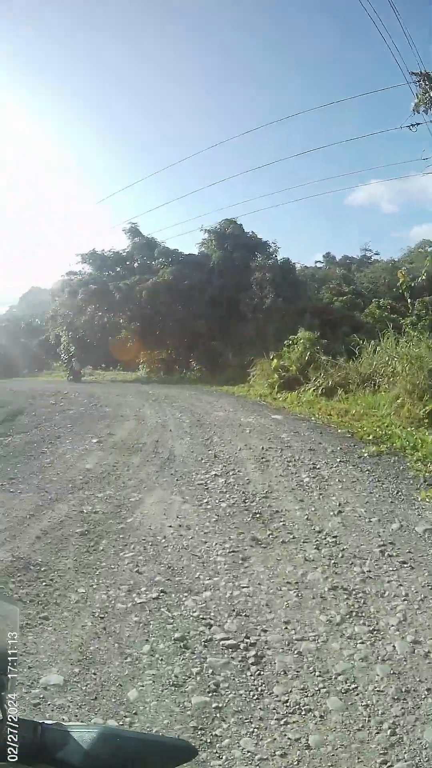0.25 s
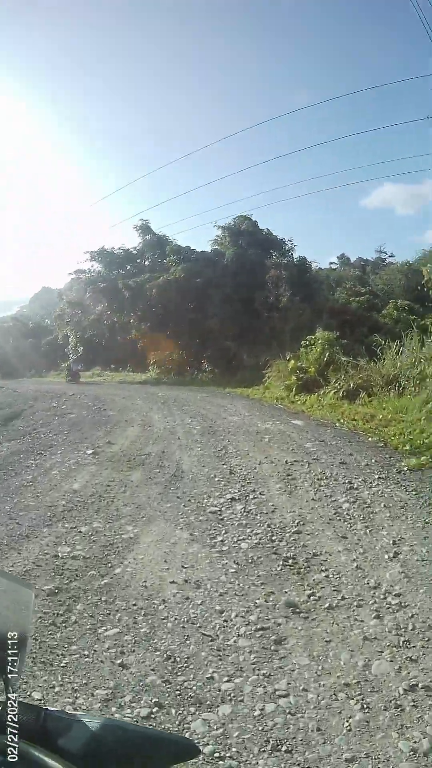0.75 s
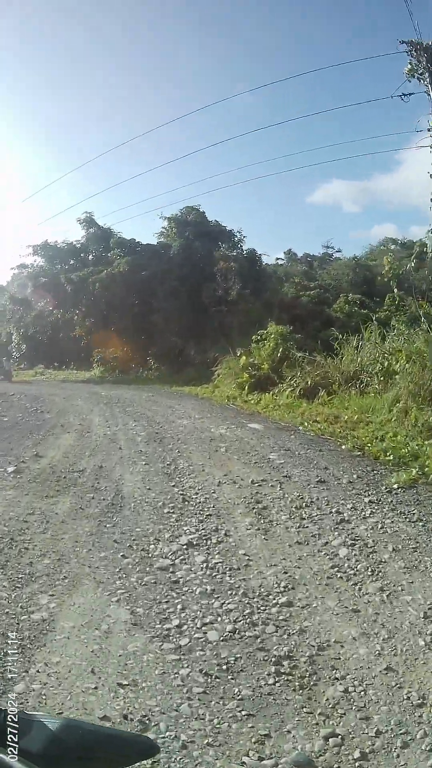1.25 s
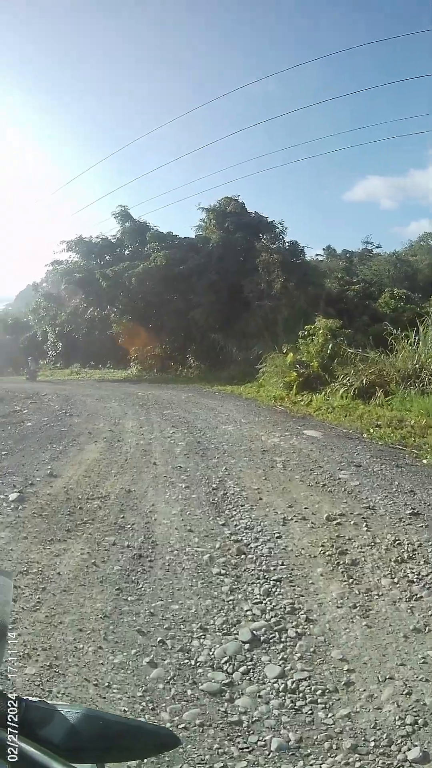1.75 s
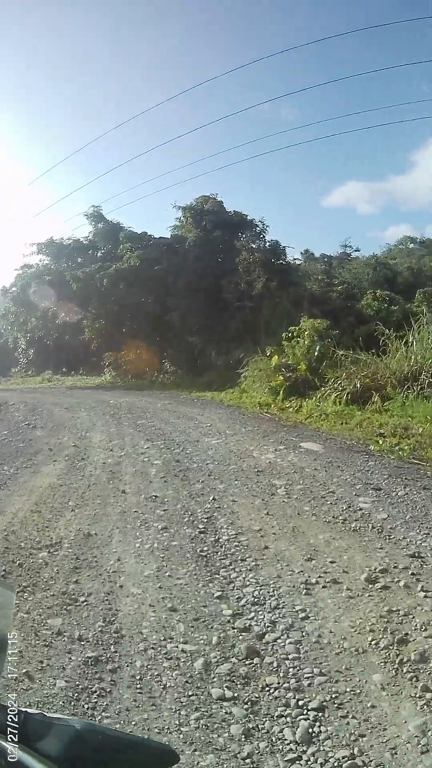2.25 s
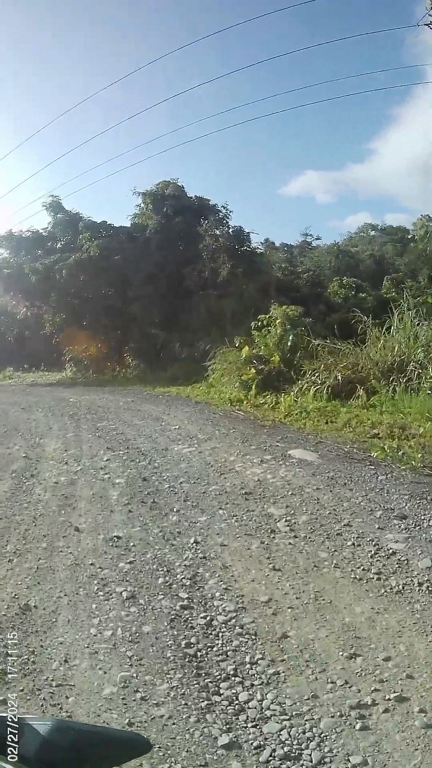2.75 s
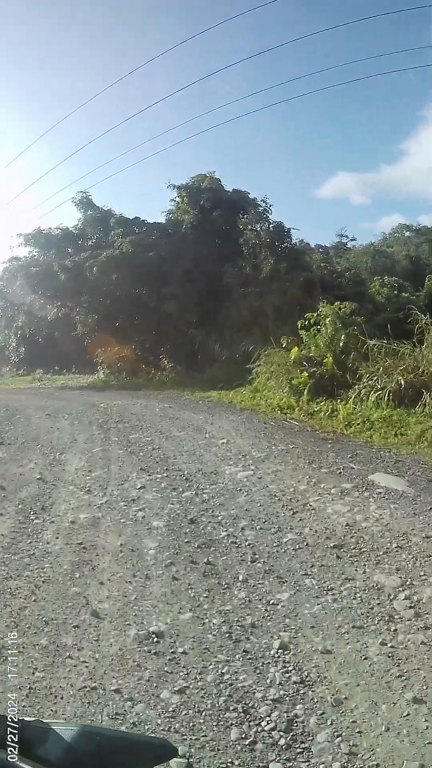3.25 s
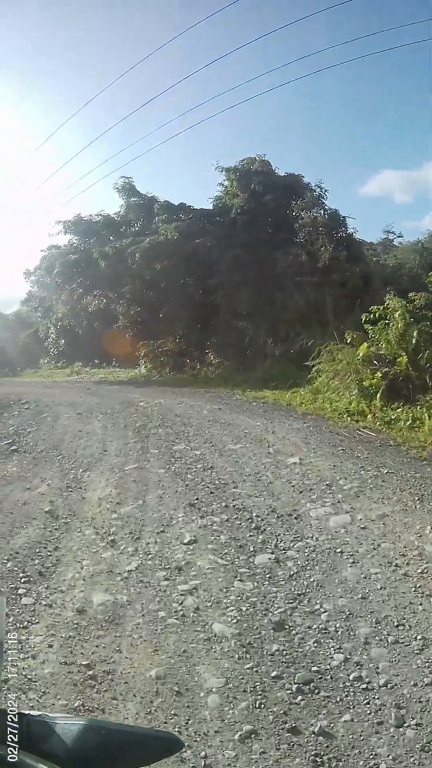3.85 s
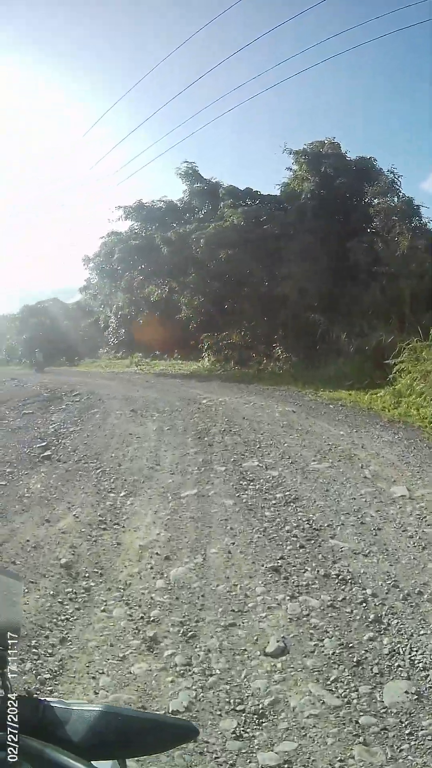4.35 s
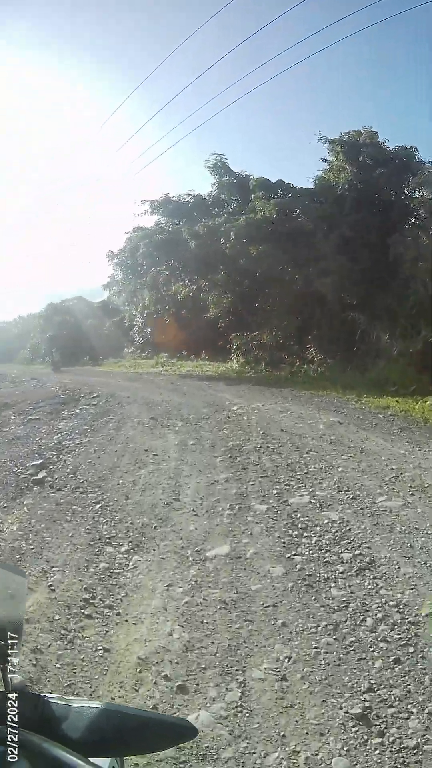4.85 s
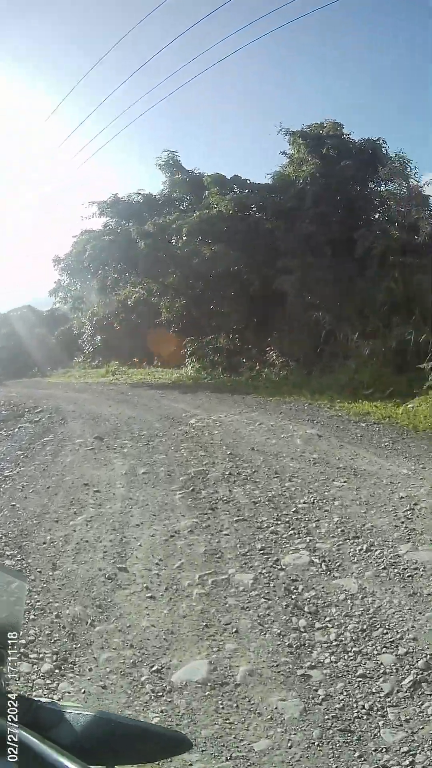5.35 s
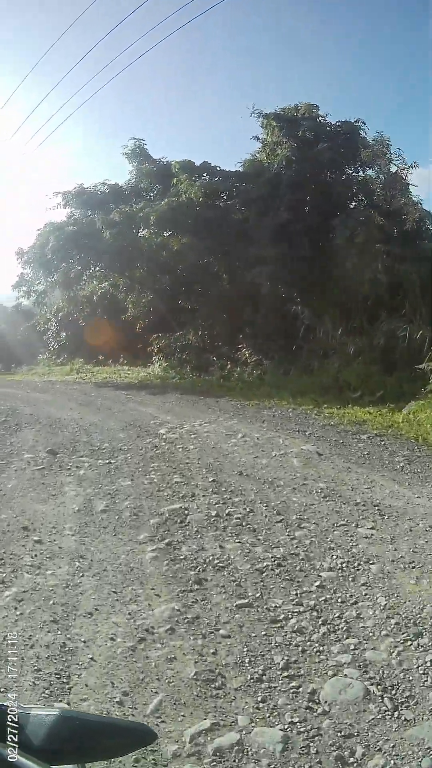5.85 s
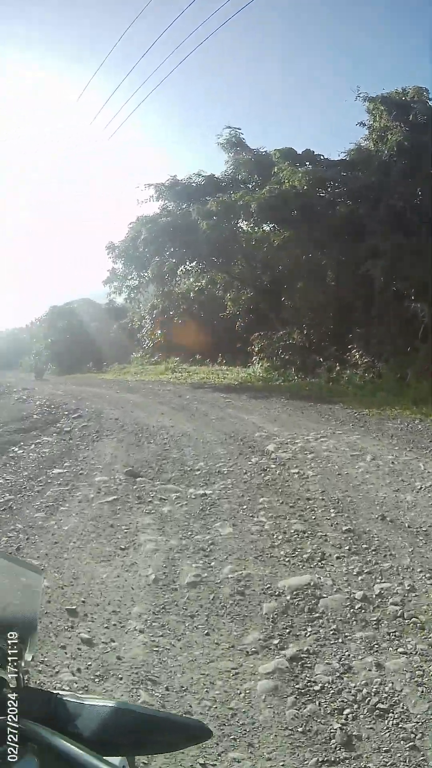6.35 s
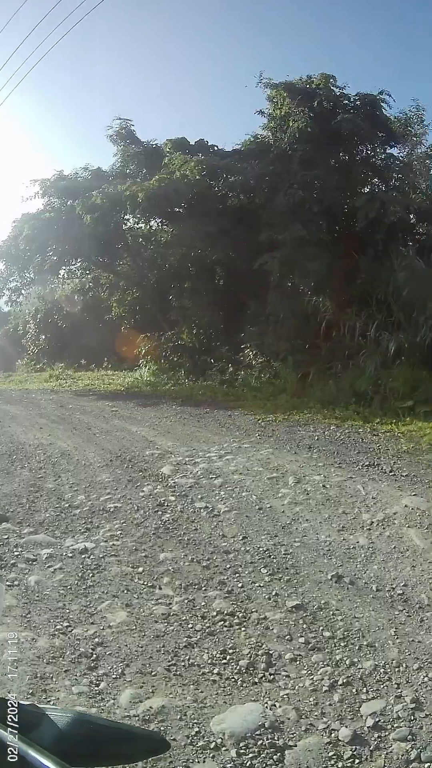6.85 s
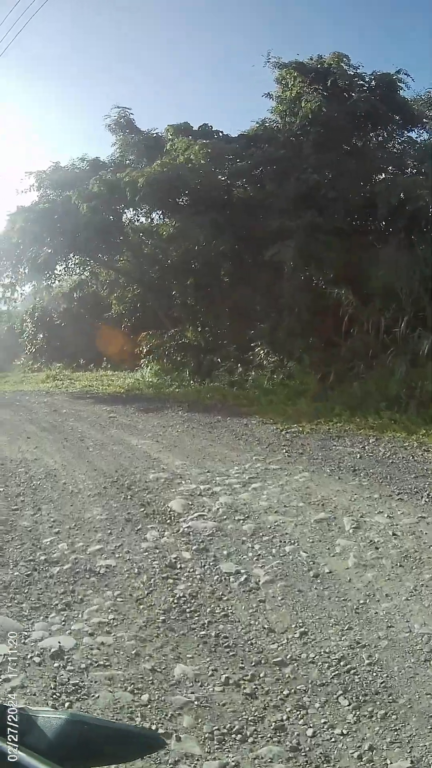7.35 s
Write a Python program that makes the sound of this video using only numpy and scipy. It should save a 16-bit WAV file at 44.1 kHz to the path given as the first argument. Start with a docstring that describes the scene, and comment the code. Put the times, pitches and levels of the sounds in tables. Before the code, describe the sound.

The sound starts with the motorcycle already moving and continues to about 7.5 seconds without stopping. A two-cylinder engine at low revs putters in quick pairs, roughly twelve a second, with low, round exhaust thumps and boxy, midrange clatter and knocking. A few misses occur in the first 0.3 seconds, then it runs fairly evenly until about 1.9; from 3 onward it misses often, turning lumpy with low fluttering puffs. A hollow drone wavers up around 1.2-1.6, 2.4 and 3.7-4. Tyres rumble steadily underneath. Stones knock the frame irregularly, notably at 2.8, 3.9, a hardest one at 4.5, then 5.35, 6.2, 7.3 and 7.45. Dry grit snaps at 0.5, 2.9, 3.95 and 5.35. Faint pulsing whirr and hiss sit on top, with tiny, very high insect chirps near 0.5, 3.4, 4.3, 5.2 and 6.1. Close on-bike microphone, outdoors, dull and dry.

```python
"""Twin-cylinder motorcycle on gravel

A motorcycle plods along a gravel road at low revs, heard from a small camera on the bike. The cylinders fire in
quick pairs and often miss: exhaust pulses ring tuned silencer modes, and a miss adds a burst of low noise.
The case clatters (filtered noise) and knocks on the frame (ringing modes), with a wavering drone, a pulsing
whirr and tyre rumble. Stones ring the frame, grit cracks in noise bursts, an insect chirps pure tones far off."""
import sys
import numpy as np
from scipy import signal
from scipy.fft import rfft, irfft
from scipy.io import wavfile

SR = 44100
rng = np.random.default_rng(int(sys.argv[2]) if len(sys.argv) > 2 else 0)


def digitize_waveform(pressure):
    """Quantize a signal to 16-bit integers and store it at the path in sys.argv[1].

    Rows of a 2-D input are taken as channels; values are limited to [-1, 1].
    """
    field = np.atleast_2d(pressure).T
    bounded = np.clip(field, -1, 1)
    quanta = np.round(bounded * 32767).astype(np.int16)
    wavfile.write(sys.argv[1], SR, quanta)


N = 336042

# Spectrum of a dull knock. Each row: frequency in Hz, relative density in dB per Hz.
KNOCK_SPECTRUM = [(300, -12), (700, 9), (1400, -13), (2400, -12.5), (3200, -30.5), (4500, -30), (6500, -45),
                  (12000, -82.5)]
# Ringing modes of the frame. Each row: frequency in Hz, relative level under a stone in dB,
# relative level under a combustion knock in dB, time to fall 60 dB in seconds.
FRAME_MODES = [(498.5, -6.5, -1, 0.027), (708, -2.5, 0.5, .04), (800, -4, -11, 0.03),
               (1150, -8, -4.5, 0.032), (1305, -1, -12.5, 0.02), (1411, 1.5, -7, 0.019),
               (1556, -23.5, -9, 0.038), (1940, -17.5, -17.5, 0.0081), (2516, -25.5, -11, 0.026),
               (2740, -25, -17.5, 0.013), (3460, -33, -37, 0.027)]


def from_db(db):
    """Decibels to gain."""
    return 10 ** (np.asarray(db) / 20)


def rms_one(x):
    """Scale to rms 1."""
    return x / np.sqrt(np.mean(x ** 2) + 1e-20)


def clicks(times_s, sizes):
    """One click per time, in a train with a run-in of 0.1 s."""
    train = np.zeros(N + SR // 5)
    places = np.round(np.asarray(times_s) * SR).astype(int) + SR // 10
    np.add.at(train, np.clip(places, 0, len(train) - 1), sizes)
    return train


def cut(x):
    """Drop the run-in."""
    return x[SR // 10:SR // 10 + N]


def ring(train, hz, t60):
    """Two-pole resonator: a unit click sets a sine of starting height 1 ringing, down 60 dB after t60 seconds."""
    r = from_db(-60 / (t60 * SR))
    w = 2 * np.pi * hz / SR
    return signal.lfilter([0, np.sin(w)], [1, -2 * r * np.cos(w), r * r], train + 1e-18)


def colour(x, spectrum, peaks=()):
    """Causal (minimum-phase) filter of unit energy from a spectrum and resonant lifts."""
    hz = np.maximum(np.arange(4097) * SR / 8192, 1)
    points = np.array(spectrum)
    db = np.interp(np.log(hz), np.log(points[:, 0]), points[:, 1])
    for centre_hz, width_hz, lift_db in peaks:
        db = db + lift_db / (1 + (2 * (hz - centre_hz) / width_hz) ** 2)
    # folding the cepstrum onto positive time gives the minimum phase
    cepstrum = irfft(np.log(from_db(db)))
    cepstrum[1:4096] *= 2
    cepstrum[4097:] = 0
    response = irfft(np.exp(rfft(cepstrum)))
    unit_response = response / np.sqrt(np.sum(response ** 2))
    return signal.fftconvolve(x, unit_response)[:len(x)]


def drift(rate):
    """Slow chance of spread 1: noise smoothed by two poles at this rate in Hz."""
    r = np.exp(-2 * np.pi * rate / SR)
    smooth = signal.lfilter([1], [1, -2 * r, r * r], rng.standard_normal(N + SR))
    return rms_one(smooth[SR:])


def dying(train, t60):
    """Noise that starts at each click and dies away by 60 dB in t60 seconds."""
    envelope = signal.lfilter([1], [1, -from_db(-60 / (t60 * SR))], train)
    return envelope * rng.standard_normal(len(train))


def bumps(times_s, rise_s):
    """After each time a swell of height 1 that peaks rise_s later."""
    r = np.exp(-1 / (rise_s * SR))
    return cut(signal.lfilter([np.e * (1 - r)], [1, -2 * r, r * r], clicks(times_s, 1) + 1e-18))


def swells(times_s, half_s):
    """A smooth bump of height 1 around each time (rows)."""
    distance_s = np.arange(N) / SR - np.asarray(times_s)[:, None]
    return np.exp(-(distance_s / half_s) ** 2)


def strike(times_s, db, scatter_db):
    """Blows (rows) through rubber and oil ring each frame mode (columns), which swells for a few ms."""
    contact_t60_s = 0.008
    luck = rng.standard_normal(db.shape)
    signs = np.where(luck * 7 % 1 < .5, 1, -1)
    sizes = from_db(db + scatter_db * luck) * signs
    swell = 2 * (1 - from_db(-60 / (contact_t60_s * SR)))    # offsets the gain of the second resonator
    total = 0
    for (hz, _, _, t60), size in zip(FRAME_MODES, sizes.T):
        total = total + swell * ring(ring(clicks(times_s, size), hz, t60), hz, contact_t60_s)
    return cut(total)


def firings():
    """Times, burns and unburnt puffs of both cylinders: the crank follows a speed curve and loses time at misses."""
    # Engine speed. Each row: time in seconds, length in ms of a cycle in which both cylinders burn.
    cycle_curve = [(-0.019, 80.38), (0.143, 85.35), (0.234, 79.66), (0.549, 76.43), (1.21, 90.89),
                   (1.466, 76.17), (1.621, 79.24), (2.09, 75.29), (2.317, 75.41), (3.016, 78.9),
                   (3.26, 82.14), (3.66, 73.18), (4.036, 74.2), (4.11, 81.89), (4.276, 78.05),
                   (4.596, 79.39), (4.996, 74.13), (5.304, 77.25), (5.934, 76.87), (6.176, 81.24),
                   (6.509, 82.73), (6.592, 78.94), (6.674, 82.97), (7.174, 80.21), (7.424, 84.6),
                   (7.508, 81.0)]
    # Misfiring cycles. Each row: time in seconds, burn of the first cylinder, burn of the second
    # (about 1 is full), strength of the unburnt puff for a full miss.
    misfire_rows = [(0.14, 0.91, 0.0, 1.1), (0.23, 0.48, 0.68, 0.64), (0.31, 0.91, 0.88, 1.2),
                    (1.94, 0.2, 0.84, 0.8), (2.24, 0.4, 1.0, 1.0), (2.55, 0.17, 0.76, 1.1),
                    (3.02, 0.12, 0.9, 0.9), (3.09, 0.07, 0.9, 1.1), (3.26, 0.02, 0.72, 1.4),
                    (3.34, 0.93, 0.12, 1.2), (3.5, 0.95, 0.7, 0.9), (3.66, 0.4, 0.52, 0.7),
                    (3.81, 0.28, 0.56, 0.9), (3.96, 0.0, 0.8, 0.9), (4.11, 0.84, 0.7, 1.2),
                    (4.28, 0, 0.44, 0.9), (4.43, 0.03, 0.6, 0.6), (4.6, 0.7, 0.7, 1.0),
                    (4.76, 0.09, 0.046, 0.68), (4.92, 0.2, 0, 0.9), (5.07, 0.24, 0.6, 0.89),
                    (5.22, 0, 0.64, 0.7), (5.38, 0.68, 0.7, 1), (5.54, 0.8, 0.29, 1.5),
                    (5.69, 0.56, 0.12, 1.0), (5.85, 0.07, 0.6, 0.9), (6.01, 0.12, 0.08, 0.99),
                    (6.18, 0.12, 0.56, 0.8), (6.34, 0.2, 0.68, 0.5), (6.51, 0.7, 1.08, 1.2),
                    (6.59, 0.88, 0.17, 1.7), (6.76, 0.8, 0.11, 1.5), (6.93, 0.2, 0.64, 1.1),
                    (7.09, 0.2, 0.72, 0.54), (7.34, 0.0, 0.68, 1.4)]
    first_exhaust_s, second_lag = -0.0197, 0.242    # the second cylinder follows by this share of a cycle
    miss_slows_ms = (2.75, 3.24)    # a full miss of each cylinder lengthens the cycle
    weak_late_ms = 1.55    # an empty charge leaves this much later, a weak one in proportion
    full_burn, burn_scatter = (0.87, 1.103), 0.049    # usual burn of each cylinder, and its spread
    crank_s, rows, misfires = first_exhaust_s, [], np.array(misfire_rows)
    while crank_s < N / SR:
        nearest = misfires[np.argmin(abs(misfires[:, 0] - crank_s))]
        missed = abs(nearest[0] - crank_s) < .03
        lack = np.clip(1 - nearest[1:3], 0, 1) * missed
        cycle_ms = np.interp(crank_s, *np.transpose(cycle_curve))
        late_ms = np.array([0, second_lag * cycle_ms]) + weak_late_ms * lack
        usual = full_burn + burn_scatter * rng.standard_normal(2)
        burn = nearest[1:3] if missed else usual
        rows.append([crank_s + late_ms / 1000, burn, lack * nearest[3]])
        crank_s += (cycle_ms + lack @ miss_slows_ms) / 1000
    # all cycles of the first cylinder, then all of the second
    return np.transpose(rows, (1, 2, 0)).reshape(3, -1)


def knock_times(s):
    """Combustion knocks come ahead of the exhaust pulse of each cylinder."""
    early_s = (0.018, 0.015)
    return s - np.repeat(early_s, len(s) // 2)


def rumble():
    """Tyres and frame: low noise whose level drifts slightly."""
    # Each row: frequency in Hz, relative density in dB per Hz.
    spectrum = [(25, -42), (45, -20), (70, 12), (120, 10.5), (200, 5), (320, 9), (400, -7), (600, -48),
                (2000, -110)]
    level = from_db(-32.5 + 0.77 * drift(4.3))
    return level * colour(rng.standard_normal(N), spectrum)


def exhaust(s, burn, puff):
    """Burnt and unburnt charges strike the silencer modes differently, softened above and thinned below."""
    # Silencer modes. Each row: frequency in Hz, time to fall 60 dB in seconds,
    # signed height per unit of burn, signed height per unit of unburnt puff.
    silencer = [(72.75, 0.2, -0.43, -0.038), (98.3, .162, 0.0092, 0.24), (133.3, 0.055, 0.62, 0.086),
                (181.5, 0.069, 0.26, -0.08), (330.6, 0.12, -0.2, -0.02)]
    miss_late_s, pulse_soft_hz, mic_low_hz = 0.003, 271, 41    # unburnt gas leaves a little later
    burnt = clicks(s, burn)
    missed = clicks(s + miss_late_s, puff)
    modes = sum(ring(full * burnt + miss * missed, hz, t60) for hz, t60, full, miss in silencer)
    soft = signal.lfilter(*signal.butter(2, pulse_soft_hz, fs=SR), modes)
    return cut(signal.lfilter(*signal.butter(2, mic_low_hz, "high", fs=SR), soft))


def engine_case(s, burn):
    """Gears and valves clatter, uneven in each register; each combustion bursts in noise and rings the frame."""
    # Engine case heard through the camera shell. Each row: frequency in Hz, relative density in dB per Hz.
    case = [(220, -16.5), (400, -7), (600, -2.5), (900, -12.5), (1300, -19.5), (1750, -26), (2300, -30.5),
            (3000, -36.5), (4000, -58.5), (6500, -78), (15000, -110)]
    # Resonances of the shell. Each row: centre in Hz, width in Hz, lift in dB (negative dips).
    shell = [(512, 94, 7), (604, 28, -9.5), (697.6, 73, 7), (1070, 79, 7), (1397, 160, 9), (2090, 170, 7),
             (2474, 41, 4.5)]
    clatter_db, clatter_swing_db = -36.5, -1.75    # level between knocks, and its slow drift
    clatter_lift, clatter_rise_s = 0.5, 0.008    # each knock shakes the case: the clatter swells after it
    knock_db, knock_rise_s, knock_t60_s = -47, 0.0023, 0.018    # rms of the noise bursts, their shape
    knock_ring_db = -41    # level of the frame ring, before the strength of each knock
    knock_s = knock_times(s)

    drifting = from_db(clatter_db + clatter_swing_db * drift(2.3))
    level = drifting * (1 + clatter_lift * bumps(knock_s, clatter_rise_s))
    taps = 0
    for edges_hz in ([150, 646], [600, 900], [900, 1250], [1250, 1800], [1800, 12000]):
        band_filter = signal.butter(2, edges_hz, "band", fs=SR, output="sos")
        band = signal.sosfilt(band_filter, rng.standard_normal(N))
        taps = taps + band * from_db(3.5 * drift(35) + 1.0 * drift(150))
    clatter = level * rms_one(colour(taps, case, shell))

    strength = (.6 + burn) * from_db(1.5 * rng.standard_normal(len(s)))
    swelling = signal.lfilter([1], [1, -np.exp(-1 / (knock_rise_s * SR))], clicks(knock_s, strength))
    knocks = colour(dying(cut(swelling), knock_t60_s), KNOCK_SPECTRUM, shell)
    blow_db = knock_ring_db + 20 * np.log10(strength)[:, None] + np.array(FRAME_MODES)[:, 2]
    rings = strike(knock_s, blow_db, scatter_db=2.5)
    return clatter + from_db(knock_db) * rms_one(knocks) + rings


def wavering(hz, level):
    """A sine that wobbles in pitch (16 Hz spread) and level (2.9 dB spread)."""
    pitch = hz + 16.0 * drift(30)
    return level * from_db(2.9 * drift(44)) * np.sin(2 * np.pi * np.cumsum(pitch) / SR)


def drone():
    """A wavering ring in the engine drone wanders and swells; a higher one joins it for a moment."""
    # Swells of the low ring. Each row: time in seconds, rise in dB.
    low_swells = [(0.98, 2), (1.23, 15), (1.561, 11.5), (2.35, 12.5), (3.25, 4), (3.7, 11), (3.95, 12.5),
                  (5.02, 7), (5.35, 6), (7.41, 2), (7.49, 9.5)]
    # Moments of the higher ring. Each row: time in seconds, level in dB before the wobble.
    groans = [(0.964, -39), (1.05, -41), (1.156, -36), (1.248, -39.5)]
    low_hz, wander_hz, low_db, groan_hz = 688, 14, -44.5, 965    # low level is before swells and wobble
    s, db = np.transpose(low_swells)
    low_level = from_db(low_db + db @ swells(s, half_s=0.06))
    low = wavering(low_hz + wander_hz * drift(5.0), low_level)
    s, db = np.transpose(groans)
    return low + wavering(groan_hz, from_db(db) @ swells(s, half_s=0.017))


def whirr(s):
    """Smooth whirr of chain and air, sinking into microphone hiss; it pulses with the valve gear."""
    # Each row: frequency in Hz, relative density in dB per Hz.
    hiss = [(1800, -34), (3000, -6), (3650, -4), (3900, -8), (4450, -3), (4800, -8), (5500, -8),
            (6300, -16), (8000, -18), (9000, -21), (15500, -23)]
    # Resonances in it. Each row: centre in Hz, width in Hz, lift in dB.
    hiss_peaks = [(3630, 100, 4), (4400, 80, 4)]
    hiss_db, tick_lift, tick_rise_s = -70, 0.56, 0.003    # level between ticks, relative rise at a tick
    valve_later_s = 0.035    # valves tick at each knock and about half a cycle on
    knock_s = knock_times(s)
    ticks = bumps(np.r_[knock_s, knock_s + valve_later_s], tick_rise_s)
    noise = colour(rng.standard_normal(N), hiss, hiss_peaks)
    return from_db(hiss_db) * (1 + tick_lift * ticks) * noise


def flutter(s, puff):
    """Gas flutters in the pipe after a miss: a rough low noise burst through two equal resonators."""
    hz, width_hz, burst_t60_s, rms_db = 165.4, 36, 0.12, -32.5
    puffs = dying(cut(clicks(s, puff)), burst_t60_s)
    ring_t60_s = np.log(1000) / (np.pi * width_hz)
    return from_db(rms_db) * rms_one(ring(ring(puffs, hz, ring_t60_s), hz, ring_t60_s))


def stones():
    """Stones ring the frame over a dull thud of noise; some reach the low modes more than others."""
    # Each row: time in seconds, nominal level in dB, extra level of the modes below 1000 Hz in dB.
    listed = [(0.403, -32, -2), (0.4698, -27, -9), (0.9066, -33, 0.5), (1.0964, -32, -1), (1.1623, -30, 10),
              (1.288, -27.5, 3.5), (1.4745, -30.5, 4), (1.6821, -37, 12), (2.3755, -31.5, 0),
              (2.7736, -24, -8), (2.9931, -31, 0), (3.2031, -28.5, 7), (3.4865, -43, 9),
              (3.7184, -26, 10.5), (3.7934, -39.5, 15.5), (3.8924, -34.5, 12), (3.9404, -26, 18),
              (4.1144, -37.5, 9), (4.3131, -28, 2), (4.5391, -16.5, 5), (4.845, -33, -4), (4.8967, -31, 5),
              (4.9781, -27, -1), (5.0045, -37, 19.5), (5.035, -32.5, 14), (5.0903, -25, 5.5),
              (5.1814, -42, 15), (5.2554, -36, 9), (5.3512, -20.5, 3.5), (5.6024, -34.5, 0),
              (5.7149, -28, -1), (5.7624, -36, 17), (6.1818, -24, 4.5), (6.2447, -42, 2), (6.3041, -27, -6),
              (6.3874, -24.5, -2), (6.6484, -31, 13), (6.6797, -39, 10.5), (6.9054, -39, 16),
              (6.9406, -26.5, 5), (7.3148, -21.5, 0.5), (7.4026, -32, 11.5), (7.4515, -21.5, -2),
              (7.5732, -44, 13)]
    # smaller stones at random moments
    pebble_count, pebble_db, pebble_spread_db = 18, -36, 2.5    # level within the spread either way
    thud_db, thud_t60_s = -11.5, 0.066    # thud level relative to the stone
    luck = rng.random((pebble_count, 3))
    ranges = [N / SR, 2 * pebble_spread_db, 14.0]
    lowest = [0, pebble_db - pebble_spread_db, -5.0]
    s, level_db, low_db = np.r_[listed, luck * ranges + lowest].T
    hz, stone_db = np.array(FRAME_MODES)[:, 0], np.array(FRAME_MODES)[:, 1]
    thud_clicks = cut(clicks(s, from_db(level_db + thud_db)))
    thuds = colour(dying(thud_clicks, thud_t60_s), KNOCK_SPECTRUM)
    blow_db = level_db[:, None] + stone_db + low_db[:, None] * (hz < 1000)
    return thuds + strike(s, blow_db, scatter_db=1.5)


def grit():
    """Grit cracks sharply: each crack is a few ms of dying noise, with a shorter top end."""
    # Each row: time in seconds, nominal level in dB, top end relative to it in dB.
    cracks = [(0.4697, -36.5, -19), (0.9166, -42, -20), (1.517, -43, -30), (2.385, -45.5, -12),
              (2.9432, -34.5, -16), (3.433, -53, -24), (3.7676, -37.5, -24.5), (3.8028, -50, -31),
              (3.9507, -29, -23), (3.968, -38.5, -25), (4.32, -50, -26), (4.9033, -35.5, -20),
              (5.3523, -31.5, -22), (5.3687, -36, -19), (6.184, -53, -18), (6.4108, -39.5, -22),
              (7.3148, -53, -31)]
    # Body of a crack. Each row: frequency in Hz, relative density in dB per Hz.
    body_spectrum = [(800, -12), (2000, 0.5), (3500, 11.5), (4400, 2), (5500, -2), (6500, -14),
                     (9000, -51.5)]
    # Top end of a crack. Each row: frequency in Hz, relative density in dB per Hz.
    top_spectrum = [(4500, -42), (6000, -5.5), (7800, 2.5), (9000, -10.5), (11000, -7), (15000, -23)]
    # finer grit at random moments, at levels from the lowest up to 8 dB above it
    sand_count, sand_lowest_db, sand_top_db = 14, -57.5, -16.5
    sand = rng.random((sand_count, 3)) * [N / SR, 8.0, 0] + [0, sand_lowest_db, sand_top_db]
    s, level_db, top_db = np.r_[cracks, sand].T
    body = dying(cut(clicks(s, from_db(level_db - 6.5))), t60=0.015)
    top = dying(cut(clicks(s, from_db(level_db + top_db + 1.0))), t60=0.0037)
    return colour(body, body_spectrum) + colour(top, top_spectrum)


def insect():
    """Short pure chirps far off that swell and stop, with a faint echo smeared by decaying noise."""
    # Each row: start in seconds, peak level in dB.
    chirps = [(0.5347, -56), (3.4106, -55), (4.2877, -53), (5.2061, -61), (6.123, -53)]
    chirp_hz, chirp_ms, echo_db, echo_t60_s = 12380, 12.5, -33.5, 0.15
    out, t = np.zeros(N), np.arange(N) / SR
    for s, peak_db in chirps:
        phase = np.clip((t - s) * 1000 / chirp_ms, 0, 1)
        out += from_db(peak_db) * np.sin(np.pi * phase) ** .8 * np.sin(2 * np.pi * chirp_hz * t)
    echo_t = np.arange(SR // 10) / SR
    scatter = rng.standard_normal(SR // 10) * from_db(-60 * echo_t / echo_t60_s)
    return out + from_db(echo_db) * signal.fftconvolve(out, scatter)[:N]


def scene():
    """All sources at the one microphone."""
    s, burn, puff = firings()
    engine = exhaust(s, burn, puff) + engine_case(s, burn) + drone() + whirr(s) + flutter(s, puff)
    road = rumble() + stones() + grit()
    return (engine + road + insect())[None]


def record(dry):
    """A steep low-pass cuts the top, 70 dB down from 16 kHz."""
    return signal.sosfilt(signal.cheby2(20, 70, 16000, fs=SR, output="sos"), dry)


dry = scene()
out = record(dry)
digitize_waveform(out)
```